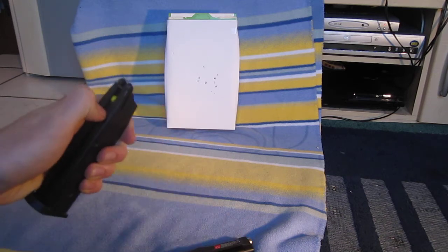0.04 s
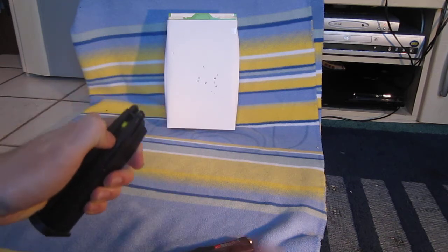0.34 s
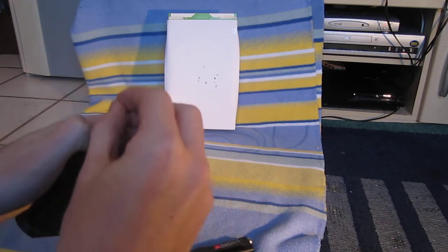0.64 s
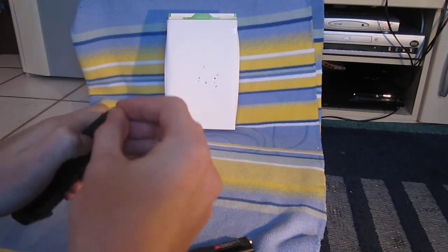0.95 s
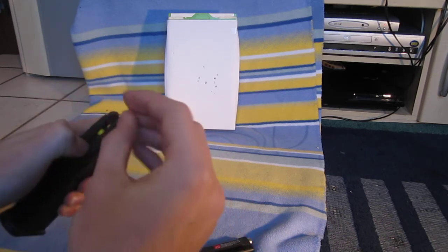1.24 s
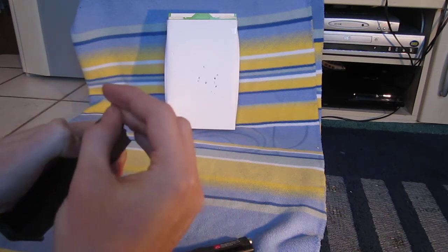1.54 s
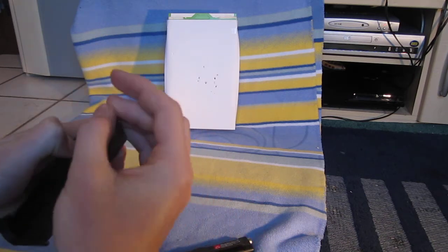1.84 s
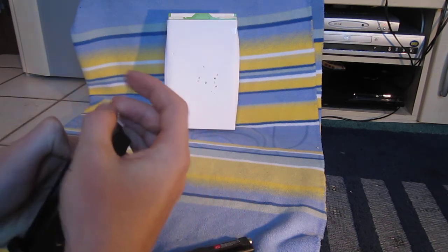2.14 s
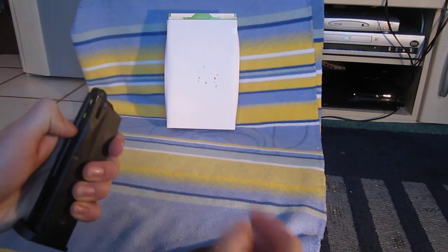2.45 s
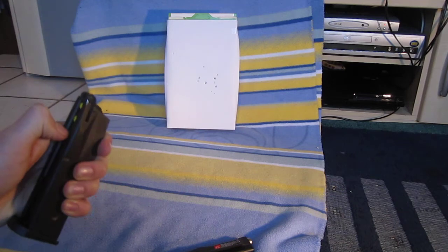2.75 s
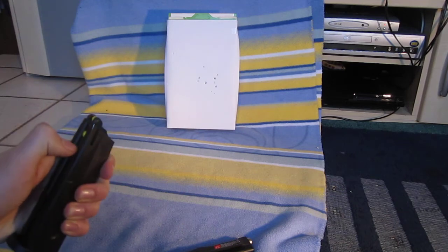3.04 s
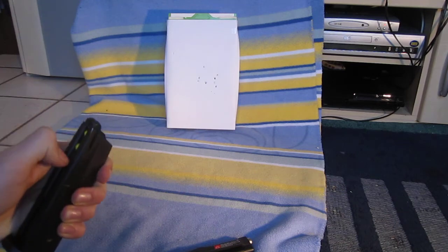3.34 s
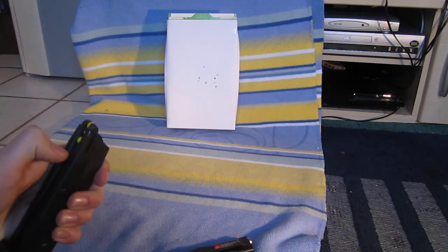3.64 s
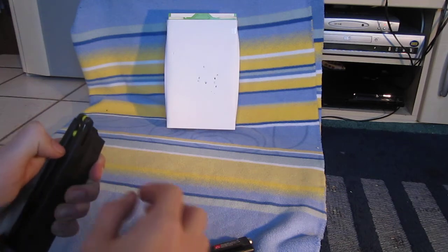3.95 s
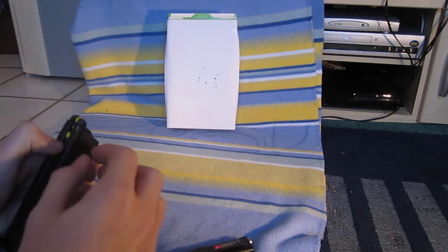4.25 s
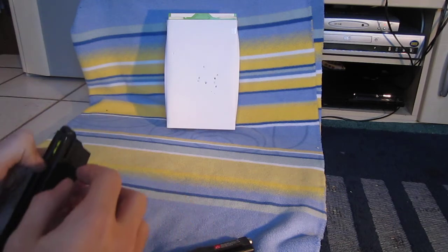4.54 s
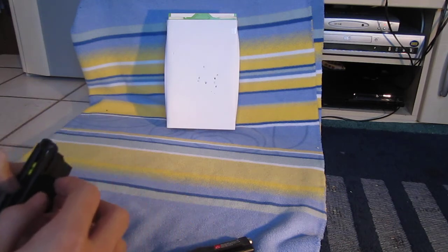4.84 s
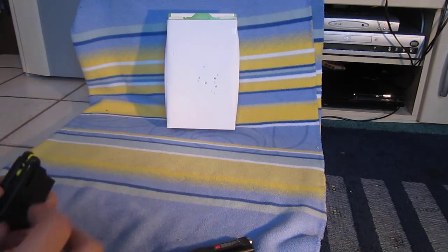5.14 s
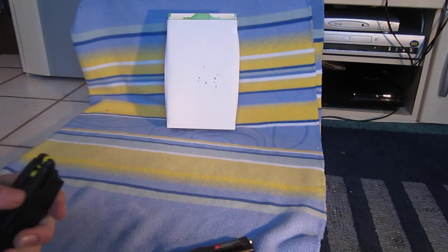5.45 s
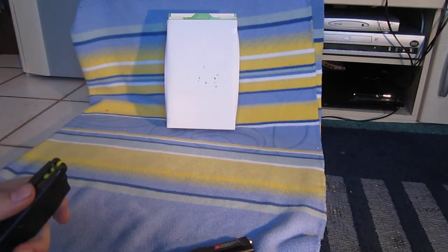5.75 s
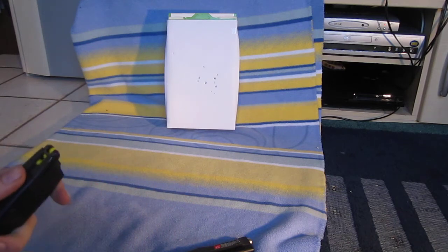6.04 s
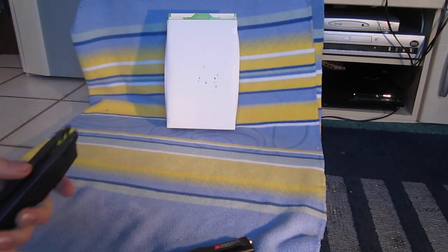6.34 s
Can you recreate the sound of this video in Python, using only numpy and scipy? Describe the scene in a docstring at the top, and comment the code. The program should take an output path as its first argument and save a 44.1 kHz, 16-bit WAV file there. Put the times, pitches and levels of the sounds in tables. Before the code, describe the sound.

Over a quiet, steady electrical hum in a small room, the parts of an airsoft magazine tick and rasp lightly under someone's fingers, close up. About halfway through, a spring-loaded part shuts with a bright, hard snap, far louder than the handling. A short run of clicks and scrapes follows, then another equally crisp snap. After that only the hum remains, with a faint low rumble as the grip shifts.

```python
"""Fingers work the magazine of an airsoft pistol close to a camera microphone in a small room.
Over mains hum and room noise, skin brushes the casing; from 0.8 s the parts tick on impact and scrape
by stick-slip friction. At 3.4 s and again at 4.9 s a sprung part snaps home and rings the magazine's
modes; each time the camera's gain control ducks everything and creeps back over a second.
Near 6 s the hand shifts its grip with a soft rumble."""
import sys
import numpy as np
from scipy import signal
from scipy.fft import rfft, irfft
from scipy.io import wavfile
from scipy.ndimage import uniform_filter1d, minimum_filter1d

SR = 44100
rng = np.random.default_rng(int(sys.argv[2]) if len(sys.argv) > 2 else 0)


def inscribe(sig):
    """Save sig as 16-bit PCM at rate SR to the path in sys.argv[1].

    A 1-D sig is mono; a 2-D sig holds one channel per row.
    Samples are clipped to [-1, 1] before scaling.
    """
    pcm = np.round(np.clip(np.atleast_2d(sig).T, -1, 1) * 32767)
    wavfile.write(sys.argv[1], SR, pcm.astype(np.int16))


N = 282705
TIME = np.arange(N) / SR
# parts sliding on each other: (start t/s, hardest t/s, end t/s, level/dB, emphasised f/Hz, top edge/dB)
SLIDES = [(.91, .935, 1.03, -59.5, 7000, -6), (1.032, 1.052, 1.14, -60, 8000, -11),
          (1.53, 1.63, 1.715, -52.5, 5200, -8), (1.921, 1.945, 2.04, -58, 6970, -9),
          (2.945, 2.99, 3.054, -46, 9400, -8), (3.239, 3.279, 3.39, -44, 8440, -5),
          (3.409, 3.422, 3.43, -47.5, 4800, -4), (3.89, 3.965, 3.99, -60, 9000, -7),
          (4.385, 4.436, 4.475, -55, 6000, -6), (4.485, 4.555, 4.67, -42, 8800, -0.5),
          (4.903, 4.908, 4.912, -42, 4500, -5)]


def snaps(crack_db):
    """Release of elastic energy: a sprung part snaps home twice, each time in a rapid run of impacts."""
    # (slam t/s, level/dB, extra run-up level/dB, time stretch, pitch ratio, top edge/dB)
    slams = [(3.4328, 9, -4.5, .92, 1.02, -2), (4.9127, 8, 3.5, 1.25, 0.94, 1)]
    # slip, catch, first touch, slam and rebound:
    # (lag from the slam t/s, level/dB, emphasised f/Hz, emphasis/dB, scuff t/s)
    stages = [(-.004, -26, 7010, 3, .0015), (-.0026, -6, 4700, 12, .0009), (-.001, -3, 8720, 8.5, .0003),
              (0, 0, 11300, 9, .0004), (.0032, -17.5, 11000, 1, .0009)]
    slip_s = stages[0][0]
    rows = []
    for slam_s, db, run_up_db, stretch, ratio, edge_db in slams:
        for lag_s, stage_db, hz, emphasis_db, scuff_s in stages:
            level_db = db + stage_db + run_up_db * max(lag_s / slip_s, 0)
            rows.append((slam_s + stretch * lag_s, level_db, ratio * hz, emphasis_db, edge_db, scuff_s))
    return contacts(rows, scuff_db=2, crack_db=crack_db, scatter_db=3)


def ticks(highpass_hz=1800):
    """Light impacts hardly move the body, so the ticks and catches radiate mostly treble."""
    # contacts that stand out: (t/s, level/dB, emphasised f/Hz, emphasis/dB, scuff t/s)
    taps = [(0.7781, -36.5, 4370, 6, 0.00043), (0.941, -47, 5400, 4, .0015), (1.0414, -35, 7800, 17, .0003),
            (1.0595, -43, 8000, 10, .0003), (1.078, -39.5, 6700, 17, .0003), (1.5831, -47, 6000, 1, .0015),
            (1.6261, -42, 5200, 4, 0.00032), (1.949, -42.5, 7100, 17, .0003),
            (1.9686, -39, 7550, 12, 0.0012), (1.9728, -36.5, 7800, 11, .0003),
            (2.0155, -36, 5250, 16, 0.00032), (2.0493, -41, 5160, 11, 0.00033),
            (2.968, -41, 9000, -3, .0015), (2.9898, -29, 9200, 3, 0.0042), (2.9969, -18.5, 9900, 11, .0003),
            (3.0265, -27, 9900, 3.5, .0004), (3.2461, -48, 4500, 3, .0015),
            (3.2988, -39.5, 4970, 17, 0.00029), (3.3355, -41.5, 4930, 17, .0013),
            (3.3964, -46, 8500, 3, .0004), (3.9783, -33, 9400, 3, .0015), (3.9953, -29, 4660, 5, 0.0021),
            (4.0285, -27, 4800, 8.5, 0.0022), (4.074, -36.5, 4600, 1, 0.0016),
            (4.159, -40, 5200, 7, 0.0018), (4.5086, -37.5, 8800, 10, .0003), (4.5483, -35, 9000, 5, .0003),
            (4.5582, -37, 8700, 14, .0003), (4.5792, -28, 8970, 5, .0005), (4.582, -26.5, 5000, 13, .0003),
            (4.604, -32.5, 9900, 2, 0.00027), (4.6199, -29, 9000, 0, .0003),
            (4.631, -32.5, 4600, 3.5, .0003), (4.6497, -35.5, 4600, 5, .0003)]
    _, hardest, _, _, _, edges_db = np.transpose(SLIDES)
    # a tick's top edge lies 2 dB below that of the parts sliding around that time
    clear = [(s, db, hz, emphasis_db, np.interp(s, hardest, edges_db) - 2, scuff_s)
             for s, db, hz, emphasis_db, scuff_s in taps]
    hits = contacts(clear + catches(), scuff_db=0.5, crack_db=4, scatter_db=4.5)
    return signal.sosfilt(signal.butter(2, highpass_hz, "highpass", fs=SR, output="sos"), hits)


def catches(per_s=42, over_scrape_db=1.5, scatter_db=2.2, emphasis_db=7, scuff_s=.0006, count=16):
    """Friction grows with load: rows of random contacts, as strong as the hand presses just then."""
    rows = []
    for start, hardest, end, db, hz, edge_db in SLIDES:
        times = start + np.cumsum(rng.uniform(.2, 1.8, count)) / per_s
        for s, luck in zip(times, rng.standard_normal(count)):
            if s < end:
                pressed_db = 20 * np.log10(stroke(s, start, hardest, end, db) + 1e-9)
                level_db = pressed_db + over_scrape_db + scatter_db * luck
                rows.append((s, level_db, hz, emphasis_db, edge_db, scuff_s))
    return rows


def contacts(rows, scuff_db, crack_db, scatter_db, size=1024):
    """Impact excitation: a knock and a brief scuff radiate directly as a crack and ring the modes."""
    # spectrum of the dry crack: (f/Hz, level/dB)
    crack_spectrum = [(60, -25), (200, -12), (450, -15), (850, -25), (1400, -16), (2600, -7.5), (3700, 1),
                      (5500, 0.5), (10000, 2.5), (15500, -9)]
    out, t = np.zeros(N), TIME[:size]
    span = .002 * SR  # a row's level is the rms of its energy spread over 2 ms
    for s, db, hz, emphasis_db, edge_db, scuff_s in rows:
        force = undb(scuff_db) * unit(rng.standard_normal(size) * np.exp(-t / scuff_s))
        force[0] += 1  # the knock
        rung = unit(signal.fftconvolve(force, ring(scatter_db))[:size])
        crack = undb(crack_db) * unit(colour(force, crack_spectrum))
        hit = unit(emphasise(rung + crack, hz, emphasis_db, edge_db))
        start = int(s * SR)
        out[start:start + size] += undb(db) * np.sqrt(span) * hit
    return out


def ring(scatter_db, size=1024):
    """Modal impulse response: the place of a blow shares its energy among damped sinusoids."""
    # resonances of the magazine: (f/Hz, bandwidth/Hz, level/dB)
    modes = [(2041, 400, -26), (3565, 140, -4.5), (4337, 290, -0.5), (4900, 150, -4), (5770, 150, -6.5),
             (7220, 210, -7.5), (7853, 220, -10), (8530, 260, -7), (9180, 700, -3.5), (10210, 240, -4),
             (11910, 230, -6), (13900, 440, -16), (16200, 260, -16)]
    t = TIME[:size]
    share = undb(scatter_db * rng.standard_normal(len(modes)))
    out = np.zeros(size)
    for k, (hz, width, db) in enumerate(modes):
        decay = width * np.exp(-np.pi * width * t)
        out += (-1) ** k * share[k] * undb(db) * decay * np.cos(2 * np.pi * hz * t)
    return unit(out)


def emphasise(x, hz, emphasis_db, edge_db, breadth=.22, edge_hz=12800):
    """Contact filtering: a small part favours its own band; the harder its edge, the more top."""
    def gain_db(f):
        peak = np.exp(-(np.log(f / hz) / breadth) ** 2)
        shelf = (1 + np.tanh(10 * np.log(f / edge_hz))) / 2
        return emphasis_db * peak + edge_db * shelf
    return shape(x, gain_db)


def scrapes(slips_per_s=1800, spread_db=5, judder_db=3.5, ring_db=-5, emphasis_db=4, size=1024):
    """Stick-slip friction: dense, uneven micro-clicks come in judders and ring the modes."""
    # spectrum of the direct friction noise: (f/Hz, level/dB)
    friction_spectrum = [(300, -24), (1500, -16.5), (2500, -1.5), (3500, -3.5), (5000, 5), (6800, -1.5),
                         (9000, -2.5), (12000, -6.5), (13200, -13), (15500, -15)]
    out, judder = np.zeros(N), judder_db * wander(220)
    for start, hardest, end, db, hz, edge_db in SLIDES:
        part = slice(int(start * SR), int(end * SR) + size)
        n = len(TIME[part])
        slips = (rng.random(n) < slips_per_s / SR) * rng.choice([-1, 1], n)
        grit = slips * undb(spread_db * np.minimum(rng.exponential(size=n), 3) + judder[part])
        rung = steady(signal.fftconvolve(grit, ring(scatter_db=5.5))[:n])
        direct = steady(colour(grit, friction_spectrum))
        rasp = emphasise(direct + undb(ring_db) * rung, hz, emphasis_db, edge_db)
        out[part] += steady(rasp) * stroke(TIME[part], start, hardest, end, db)
    return out


def hands(flutter_db=3, rumble_hz=(12, 45)):
    """Friction noise of skin: it swishes softly on the casing, and a change of grip rumbles."""
    # skin brushing, and the grip shifting: (start t/s, hardest t/s, end t/s, level/dB)
    brushes = [(.1, .25, 0.31, -64), (2.54, 2.68, 2.79, -60), (2.78, 2.9, 3.26, -64.5),
               (5.96, 6.05, 6, -68)]
    shifts = [(5.9, 6.0, 6.24, -54)]
    # spectrum of skin on the casing: (f/Hz, level/dB)
    skin_spectrum = [(500, -0.5), (2000, -20), (4500, 6), (6000, -3.5), (10000, -5.5), (15500, -14.5)]
    swish = steady(colour(rng.standard_normal(N), skin_spectrum)) * undb(flutter_db * wander(60))
    band = signal.butter(2, rumble_hz, "bandpass", fs=SR, output="sos")
    rumble = steady(signal.sosfilt(band, rng.standard_normal(N)))
    brushing = sum(stroke(TIME, *row) for row in brushes)
    shifting = sum(stroke(TIME, *row) for row in shifts)
    return swish * brushing + rumble * shifting


def room(x, t60_mid_s=0.28, t60_top_s=0.18, split_hz=8000, build_s=0.0057):
    """Reverberation: reflections thicken within milliseconds, and the treble is absorbed first."""
    # spectrum that the walls give back: (f/Hz, level/dB)
    wall_spectrum = [(300, -7), (1900, -7), (3000, 0.5), (6000, 1.5), (8000, -1.5), (12000, -2),
                     (13500, -4)]
    t = TIME[:SR // 3]
    noise = colour(rng.standard_normal(len(t)), wall_spectrum)
    low = signal.sosfiltfilt(signal.butter(2, split_hz, fs=SR, output="sos"), noise)
    tail = low * undb(-60 * t / t60_mid_s) + (noise - low) * undb(-60 * t / t60_top_s)
    build_up = 1 - np.exp(-(t / build_s) ** 2)
    return signal.oaconvolve(x, unit(tail * build_up))[:N]


def background(noise_db=-54.5):
    """Stationary noise floor: the line spectrum of appliance hum over broadband room noise."""
    # steady tones in the room: (f/Hz, level/dB)
    tones = [(120, -52.8), (202, -65)]
    # room noise and microphone hiss: (f/Hz, relative spectral density/dB)
    noise_spectrum = [(8, -17), (22, -4.5), (60, 0.5), (130, -1.5), (200, -1.5), (260, -3.5), (500, -7),
                      (1000, -11.5), (2000, -16), (4500, -20.5), (9000, -26.5), (15500, -36)]
    hum = sum(undb(db) * np.sqrt(2) * np.sin(2 * np.pi * (hz * TIME + rng.random())) for hz, db in tones)
    return hum + undb(noise_db) * steady(colour(rng.standard_normal(N), noise_spectrum))


def gain_control(x, ceiling_db=-8.5, release_s=0.4, size=66):
    """Limiting: any excess over the ceiling pulls the gain down at once, then decays exponentially."""
    level = np.sqrt(np.abs(uniform_filter1d(x ** 2, size)))
    excess = np.maximum(level / undb(ceiling_db) - 1, 0)
    leak = np.exp(-TIME / release_s)
    gain = 1 / (1 + np.maximum.accumulate(excess / leak) * leak)
    # the gain is down a moment before the peak passes
    return x * uniform_filter1d(minimum_filter1d(gain, 2 * size), size)


def stroke(t, start, hardest, end, db):
    """Amplitude envelope of a hand movement that swells to its hardest point and eases off."""
    return undb(db) * np.sin(np.pi / 2 * np.interp(t, [start, hardest, end], [0, 1, 0])) ** 1.2


def wander(steps_per_s):
    """Random modulation: smoothed Gaussian steps with a spread of one."""
    hold = int(SR / steps_per_s)
    steps = np.repeat(rng.standard_normal(N // hold + 1), hold)
    return steady(uniform_filter1d(uniform_filter1d(steps, hold), hold)[:N])


def colour(x, points):
    """Spectral shaping by (f/Hz, level/dB) points joined on a log-frequency axis."""
    hz, db = np.transpose(points)
    return shape(x, lambda f: np.interp(np.log(f), np.log(hz), db))


def shape(x, db_at, size=4096):
    """Minimum-phase filter: folding the cepstrum makes a gain curve in dB causal."""
    hz = np.arange(size // 2 + 1) * SR / size + 1
    cepstrum = irfft(np.log(undb(db_at(hz))))
    cepstrum[1:size // 2] *= 2
    cepstrum[size // 2 + 1:] = 0
    response = irfft(np.exp(rfft(cepstrum)))
    return signal.oaconvolve(x, response[:len(x)])[:len(x)]


def undb(db):
    """Decibels to amplitude ratio."""
    return 10 ** (np.asarray(db) / 20)


def unit(x):
    """Normalise to an energy of one."""
    return x / np.sqrt(np.sum(x ** 2))


def steady(x):
    """Normalise to an rms of one."""
    return x / np.std(x)


def scene(handling_wet_db=-18, snap_wet_db=-21, directions=3):
    """Superposition: the direct sound of magazine and hands, their reverberation and the noise floor."""
    # every direction carries another mix of the modes, so the echo of a snap is smoother than the snap
    snap_echo = sum(room(snaps(crack_db=7.5)) for _ in range(directions)) / np.sqrt(directions)
    snapping = snaps(crack_db=3) + undb(snap_wet_db) * snap_echo
    handling = ticks() + hands() + scrapes()
    return (snapping + handling + undb(handling_wet_db) * room(handling) + background())[None]


def record(dry, hiss_db=-84, top_hz=15800):
    """Limiting and saturation: the camera rides its gain, rounds the peaks, adds hiss and cuts the top."""
    rounded = np.tanh(gain_control(dry[0]))
    hiss = undb(hiss_db) * rng.standard_normal(N)
    lowpass = signal.ellip(10, .2, 80, top_hz, fs=SR, output="sos")
    return signal.sosfilt(lowpass, rounded + hiss)[None]


dry = scene()
out = record(dry)
inscribe(out)
```